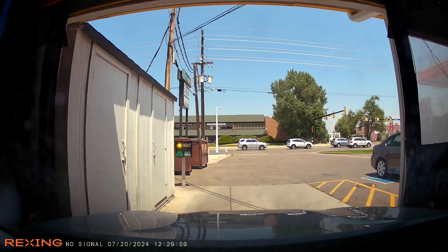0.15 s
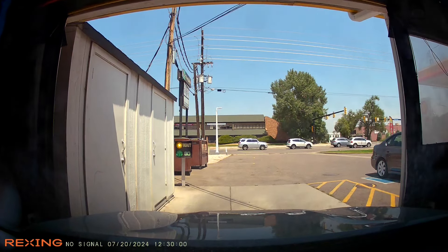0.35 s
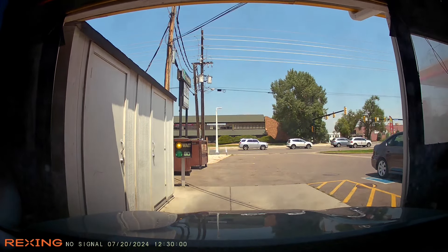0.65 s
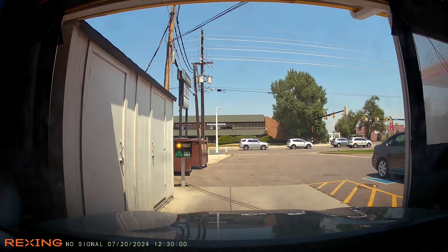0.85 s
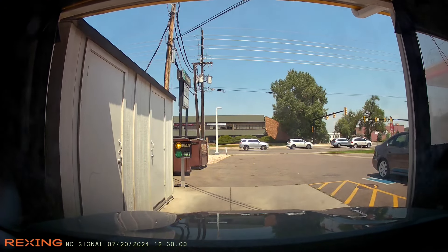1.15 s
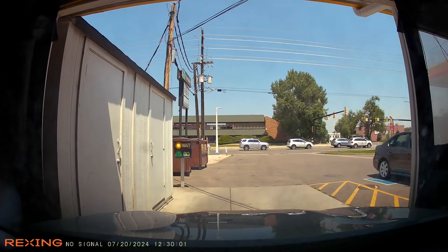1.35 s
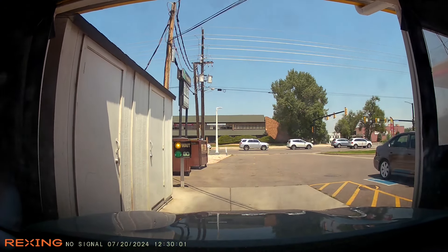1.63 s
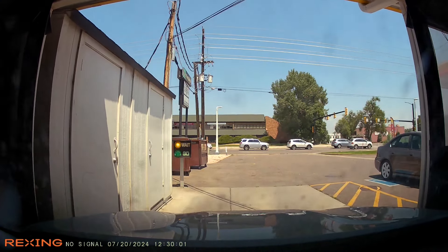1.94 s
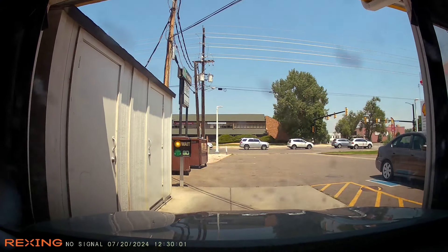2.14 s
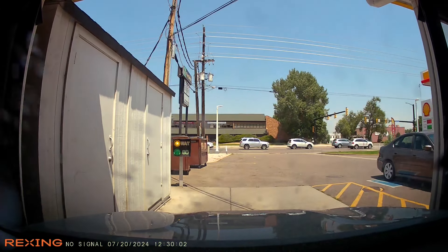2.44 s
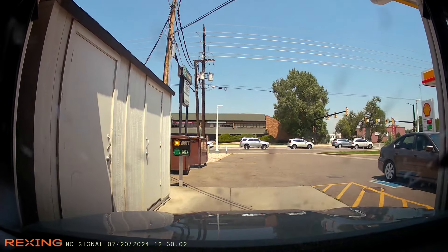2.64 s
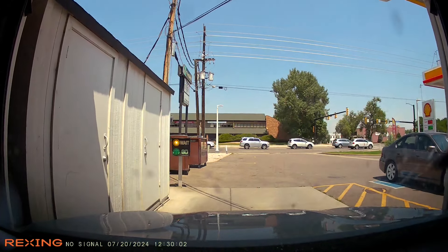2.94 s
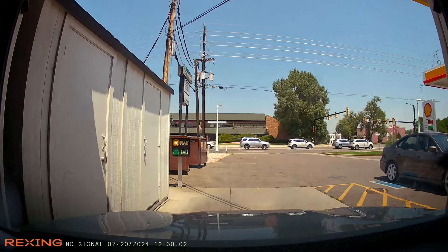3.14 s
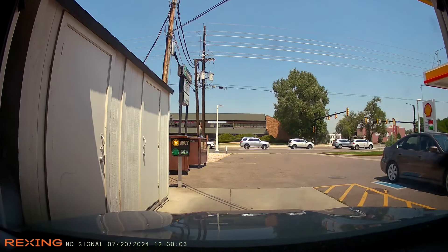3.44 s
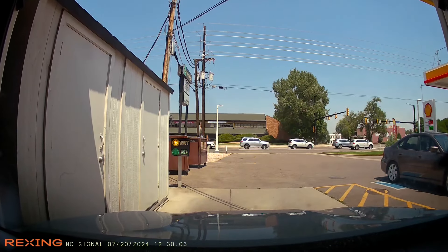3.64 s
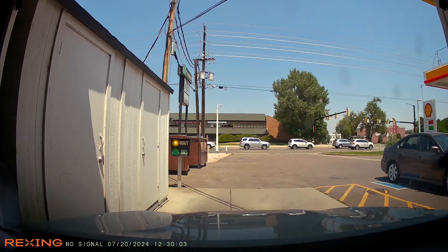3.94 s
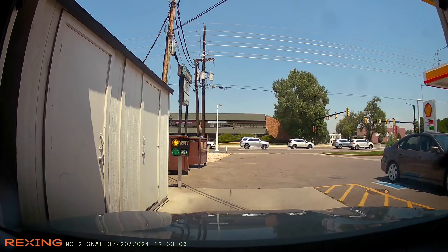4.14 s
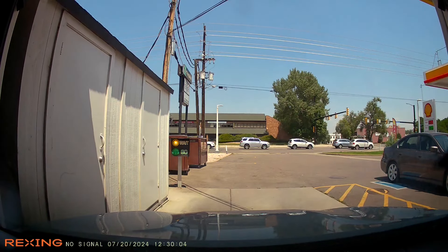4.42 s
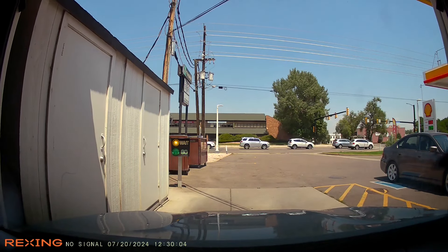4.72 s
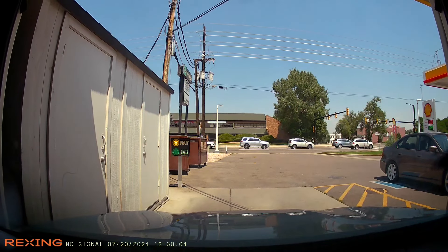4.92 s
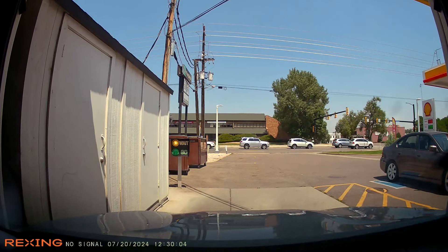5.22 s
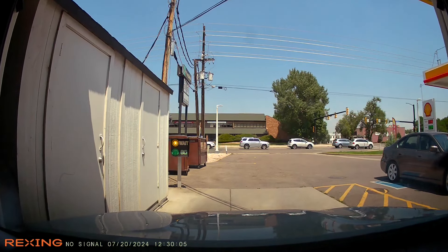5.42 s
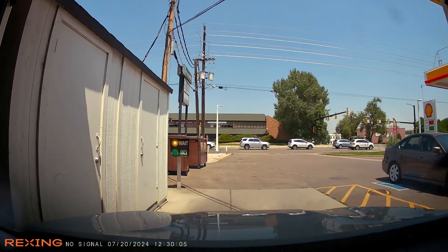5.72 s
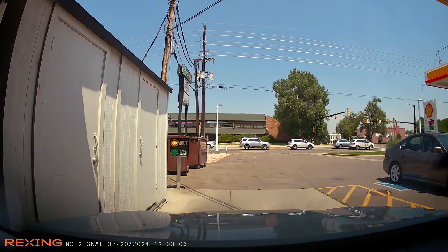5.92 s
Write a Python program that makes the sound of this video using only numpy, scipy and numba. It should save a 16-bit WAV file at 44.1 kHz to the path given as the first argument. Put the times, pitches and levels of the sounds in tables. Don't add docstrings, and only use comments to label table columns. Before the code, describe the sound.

From 0 seconds, a loud continuous blast of air surrounds a closed car under car wash dryers, heard by a two-sided microphone in the cabin. A deep boom drums the roof, fluttering with quick gusts and lulls, over low buffeting of the body and a broad roar across the glass. A faint blade hum wavers and drops out briefly, and a thin door seal hiss sputters on top. Over the first 3 seconds the boom climbs in pitch. At about 2.8 seconds loose trim on the left gives a loud, short falling creak, followed by tiny ticks and an uneven rattle until roughly 3.35. The seal hiss is strongest around 3.3 to 3.6, with flecks of very high whistle. From 3.5 to 6 the roar continues, its boom wavering in pitch, the higher rush and hiss slightly weaker and the hum fading near the end.

```python
import sys
import numpy as np
from scipy import signal
from scipy.fft import rfft, irfft, next_fast_len
from scipy.io import wavfile
from scipy.ndimage import uniform_filter1d
from numba import njit

SR = 44100
rng = np.random.default_rng(int(sys.argv[2]) if len(sys.argv) > 2 else 0)


def volts_from_decibels(level):
    exponent = np.asarray(level, float) / 20
    return 10 ** exponent


def store_wav(level_fs):
    pcm = np.round(np.clip(np.atleast_2d(level_fs), -1, 1) * 32767)
    wavfile.write(sys.argv[1], SR, pcm.T.astype(np.int16))


N = 267676

# time_s, boom_hz, distance_behind_windscreen_m
NOZZLE = [(0, 110, 0), (.7, 118.3, 0.39), (1.3, 121.6, 0.32), (2.3, 145.4, 0.091), (2.7, 136.5, 0.045),
          (3.1, 163.3, 0.42), (3.45, 147.3, 0.81), (4.2, 158.7, 0.91), (5, 144, 1.15), (5.6, 153, 1.07),
          (6.07, 136.7, 1.48)]
# pitch_hz, level_db_per_hz
BUFFET = [(11, -45), (18, -32), (100, -13), (130, -27), (220, -120)]
# pitch_hz, level_db_per_hz
ROAR = [(190, -20), (230, -3), (300, -5), (400, -5), (520, -10.5), (700, -15), (1000, -17), (1500, -19.5),
        (2300, -23.5), (3500, -26.5), (4600, -30.5), (6000, -39), (8000, -47), (12000, -66.5),
        (13600, -100)]
# pitch_hz, level_db_per_hz
SEAL = [(6500, -11), (8500, -3), (10500, -1), (12000, -3), (13300, -8.5), (15500, -25.5)]
# pitch_hz, right_db
LEAN = [(200, 0), (660, 0.5), (1100, 2), (1600, 1.5), (4000, 0.5)]
# pitch_hz, level_db
APART = [(30, -40.5), (60, -19.5), (125, -43), (200, -15.5), (360, -13), (660, -6), (1000, -2), (1700, 0.5),
         (2500, 4), (3500, 5), (5000, 7.5), (9000, 3.5)]
# pitch_hz, width_hz, level_db
CABIN = [(177, 15.7, -25.5), (160.6, 33, -28), (613.3, 22, -42.5), (788, 156, -41.5), (1175, 11, -50),
         (1783, 9.7, -54.5), (1994, 21, -62)]
# start_s, end_s, slips_per_s, unevenness_0_to_1, peak_db, right_port_db
SLIPS = [
    (2.8333, 2.874, 177, .01, -9, -7),
    (2.99, 3.115, 125, .3, -22, -8),
    (3.155, 3.265, 170, .3, -39, -1),
    (3.16, 3.345, 300, .2, -24, -16),
    (2.8107, 2.85, 177, .01, -21, -8),
    (2.8616, 2.905, 177, .05, -23, -8),
]
# start_hz, end_hz, width_hz, level_db
RINGS = [
    [(3850, 3150, 500, 0)],
    [(8600, 8600, 220, -20), (10900, 10900, 600, -18), (1750, 1750, 200, -3), (1200, 1200, 150, -4)],
    [(10250, 9950, 500, 0), (8650, 8650, 200, -3), (11600, 11600, 600, -3)],
    [(1700, 2250, 400, 0), (1250, 1250, 150, -10)],
    [(4500, 4600, 350, 0), (3500, 3500, 400, -3)],
    [(3250, 3500, 300, 0)],
]
# time_s, hiss_db
LEAK = [(0, -54), (.45, -57.5), (.83, -56.5), (1.64, -58.5), (2.1, -56.5), (2.65, -59.5), (3.28, -53),
        (3.5, -54), (3.8, -57), (4.6, -59), (5.05, -58), (5.5, -60), (6.07, -60.5)]
# pitch_hz, width_hz; then the level_db of each
MODES_HZ = [
    (375, 13),
    (440, 24),
]
MODES_DB = (-38.5, -39)
# time_s, change_db, length_s
GUSTS = [(.39, 3, 0.11), (.52, 7, 0.018), (.56, -8, 0.028), (.63, 6, 0.032), (.71, -8.5, 0.03),
         (.81, -3, 0.077), (1.06, -5.5, 0.068), (1.49, -2, 0.04), (1.53, -15, 0.018), (1.74, -5.5, 0.05),
         (1.84, 3.5, 0.044), (1.89, -8, 0.025), (2.04, -4.5, 0.098), (2.18, 8, 0.012), (2.91, 7.5, 0.0085),
         (2.96, -2, 0.035), (3.03, -1.5, 0.051), (3.21, 6.5, 0.017), (3.31, -6, 0.031), (3.9, 4, 0.049),
         (4.15, -6, 0.03), (4.65, 4.5, 0.08), (4.78, 0, 0.04), (5.24, -5, 0.068), (5.43, -15, 0.024),
         (5.57, 3.5, 0.029), (5.68, 2, 0.018), (6.05, 3.5, 0.17)]
# time_s, change_db, length_s
ROCKS = [(.05, -1, 0.067), (1.37, 6.5, 0.12), (1.71, 6.5, 0.031), (2.3, 0, 0.2), (2.64, -3, .06),
         (3.16, 3.5, 0.11), (3.35, -7, 0.094), (3.7, -7, 0.038), (4.8, -8, .06)]
# time_s, level_db
BLADE_TONE = [(0, -33.5), (.4, -34.5), (.72, -33.5), (1.2, -36.5), (1.6, -37), (2.15, -40), (2.5, -35.5),
              (3.05, -34), (3.3, -36), (3.7, -35), (4.1, -35), (4.6, -36.5), (4.9, -40), (5.2, -39),
              (5.55, -34.5), (5.8, -43), (6.07, -48)]
# time_s, change_db, length_s
SHUTS = [(2.0, 0, 0.055), (2.76, -7, 0.033), (3.1, -1.5, 0.074), (3.31, -2, 0.044), (3.45, -2.5, .06),
         (3.85, 3.5, .1), (4.55, -9, 0.043), (4.69, -10, 0.026), (4.79, -5, .03), (5.03, 1.5, 0.072),
         (5.33, -1, .04), (5.62, -10, 0.03), (5.8, -1, 0.038), (5.9, -2, .04), (6.04, -13, .04)]
# time_s, change_db, length_s
FINDS = [
    [(.45, 7, 0.26), (1.39, 7, 0.12), (2.1, -1, 0.04), (2.72, 14, 0.062), (3.23, 11, 0.05),
     (3.85, 18.5, 0.089), (4.6, 3, 0.21), (5.45, 9.5, 0.2), (6.0, 7, 0.18)],
    [(.32, 2, .06), (.68, 10, 0.12), (1.15, 6, 0.097), (1.55, 9, 0.49), (2.65, 9, 0.2), (2.95, -8, 0.086),
     (3.8, 8, 0.11), (5.07, 5, 0.1), (5.4, 4, 0.056)],
]
# low_hz, high_hz, level_under_leak_db, ease_of_opening, opens_per_db
WHISTLES = [
    (13750, 14050, -18, -1.6, .02),
    (14450, 14850, -18, -4.5, .36),
    (15100, 15600, -14, -7.8, .5),
]
# time_s, change_db, length_s
WIDEST = [(3.6, 7, .5)]
# time_s, change_db, length_s
BEATS = [(.17, -14.5, 0.042), (.39, -10, 0.028), (.94, -15, 0.03), (1.11, -7, 0.037), (1.28, -13, 0.055),
         (1.74, -2, .06), (2.08, -9, .06), (2.75, -10, .05), (2.93, -12, 0.039), (3.09, -9, .03),
         (3.38, -3.5, .05), (3.6, -8, .03), (3.92, -12, .04), (4.75, -15, .025), (4.96, -7, .04),
         (5.06, 8, 0.044), (5.27, -14, .06), (5.68, -8, .04)]
# time_s, peak_db, ring_hz, width_hz
TICKS = [(3.002, -34, 8600, 200), (3.017, -33, 8600, 200), (3.030, -31, 8600, 200), (3.038, -34, 8600, 200),
         (3.044, -38, 8600, 200), (3.054, -36, 8600, 200), (3.066, -32, 8600, 200), (3.101, -39, 8600, 200),
         (3.029, -39, 9900, 350), (3.052, -38, 10200, 350), (3.060, -31, 9700, 350),
         (3.178, -39, 10000, 400), (3.186, -38, 10100, 400), (3.192, -35, 10200, 400),
         (3.213, -38, 9800, 400), (3.244, -37, 10100, 400), (3.184, -15, 1740, 200),
         (3.206, -18, 1900, 300), (3.243, -19, 2030, 300), (3.274, -23, 2150, 300), (3.322, -22, 1980, 300),
         (2.921, -29, 3300, 350)]
# time_s, change_db, length_s
DRUMS = [
    (.33, -12, 0.18),
    (.88, 8, 0.053),
    (1.3, -1, 0.22),
    (2.4, -3, 0.19),
    (3.0, 2, 0.3),
    (4.0, -1, .2),
    (4.7, -1, 0.19),
    (5.4, 2.5, 0.1),
]

BUFFET_DB, BUFFET_DB_PER_S = -21, -1.09
BOOM_DB, BOOM_DB_PER_OCTAVE, BOOM_WIDTH_HZ, NARROWS_HZ_PER_M = -16, 4, 152, 57.5
ROAR_DB, ROAR_DB_PER_M, RUSH_DB, RUSH_DB_PER_M = -22, -1.5, -37, -4.0
TOP_DB, TOP_OPENS_PER_DB, TIP_DB = -9, 0.5, -14
BLADE_HZ, BLADE_WIDTH_HZ, BLADE_STEADY = 590.8, 7, 1.4
MODES_DB_PER_M = -3
TICK_RIGHT_DB = -14
SHARED_HZ = 6200


def curve(table):
    s, *columns = np.transpose(table)
    return [np.interp(np.arange(N) / SR, s, column) for column in columns]


def at(table, hz):
    table_hz, level_db = np.transpose(table)[:2]
    return np.interp(np.log(hz), np.log(table_hz), level_db)


def bumps(rows):
    t = np.arange(N) / SR
    return sum(db * np.exp(-((t - s) / length) ** 2) for s, db, length in rows)


def walk(rate):
    hold = int(SR / rate)
    levels = np.repeat(rng.standard_normal(N // hold + 1), hold)
    return 1.41 * uniform_filter1d(uniform_filter1d(levels, hold), hold)[:N]


def unit(x):
    return x / np.sqrt(np.mean(x ** 2))


def even(x, span_s):
    span = int(span_s * SR)
    power = uniform_filter1d(uniform_filter1d(np.mean(x ** 2, axis=0), span), span)
    return x / np.sqrt(power + 1e-12)


@njit
def svf(x, hz, width):
    y, band, low = np.empty(len(x)), 0., 0.
    for i in range(len(x)):
        g, damping = np.tan(np.pi * hz[i] / SR), width[i] / hz[i]
        v = (band + g * (x[i] - low)) / (1 + g * (g + damping))
        band, low, y[i] = 2 * v - band, low + 2 * g * v, damping * v
    return y


def field():
    size = next_fast_len(N)
    hz = np.arange(1, size // 2 + 2) * SR / size
    apart, lean = volts_from_decibels(at(APART, hz)), volts_from_decibels(at(LEAN, hz) / 2)
    mid, side = rfft(rng.standard_normal((2, size))) / np.sqrt(1 + apart ** 2)
    left = (mid + apart * side) / lean
    right = (mid - apart * side) * lean
    return hz, np.array([left, right])


def coloured(table, low_hz, high_hz, edge):
    hz, ports = field()
    fade = np.clip(.5 + np.log2([hz / low_hz, high_hz / hz]) / edge, 0, 1)
    gain = volts_from_decibels(at(table, hz)) * np.prod(np.sin(np.pi / 2 * fade), axis=0)
    return irfft(ports * gain)[:, :N]


def ring(hz, width, count=2):
    ports = irfft(field()[1])[:, :N]
    for _ in range(count):
        ports = np.array([svf(x, hz + np.zeros(N), width + np.zeros(N)) for x in ports])
    return unit(ports)


def buffet():
    level_db = BUFFET_DB + BUFFET_DB_PER_S * np.arange(N) / SR + bumps(ROCKS)
    return even(coloured(BUFFET, 14, 99.5, 0.93), 0.94) * volts_from_decibels(level_db)


def roof_boom():
    boom_hz, behind_m = curve(NOZZLE)
    octaves_up = np.log2(boom_hz / NOZZLE[0][1])
    level_db = BOOM_DB + BOOM_DB_PER_OCTAVE * octaves_up + bumps(GUSTS)
    width_hz = BOOM_WIDTH_HZ - NARROWS_HZ_PER_M * behind_m
    return even(ring(boom_hz, width_hz, count=4), 0.097) * volts_from_decibels(level_db)


def air_roar():
    behind_m = curve(NOZZLE)[1]
    roar_db = ROAR_DB + ROAR_DB_PER_M * behind_m
    rush_db = RUSH_DB + RUSH_DB_PER_M * behind_m
    air = 0
    for hz in 190 * 2 ** np.arange(0, 6.1, .5):
        rush_share = np.clip(np.log2(hz / 600) / 0.79, 0, 1)
        trend_db = rush_share * (rush_db - roar_db + 14) + roar_db
        band = coloured(ROAR, hz, hz * np.sqrt(2), 0.28)
        air = air + band * volts_from_decibels(trend_db + 0.94 * walk(9))
    return air * volts_from_decibels(22)


def gap_db():
    return curve(LEAK)[0] + bumps(SHUTS)


def choke_db(open_db, ease, opens_per_db):
    push = walk(30) - opens_per_db * (open_db + 60) - ease
    return 75 * np.clip(3 * push, 0, 1)


def seal_hiss():
    open_db = gap_db()
    leak_db = open_db - 1.8 * np.clip(walk(28), 0, 3)
    top_db = leak_db + TOP_DB - choke_db(open_db, -0.1, TOP_OPENS_PER_DB)
    tip_db = leak_db + TIP_DB - choke_db(open_db, -1.2, TOP_OPENS_PER_DB)
    body = unit(coloured(SEAL, 6000, 12000, .1)) * volts_from_decibels(leak_db + 0.3)
    top = unit(coloured(SEAL, 12000, 12800, .04)) * volts_from_decibels(top_db)
    tip = unit(coloured(SEAL, 12800, 13500, .04)) * volts_from_decibels(tip_db)
    return body + top + tip


def whistles():
    open_db = gap_db()
    wide_db = open_db + bumps(WIDEST)
    out = 0
    for low_hz, high_hz, db, ease, opens_per_db in WHISTLES:
        level_db = open_db + db - choke_db(wide_db, ease, opens_per_db)
        out = out + unit(coloured(SEAL, low_hz, high_hz, .04)) * volts_from_decibels(level_db)
    return out


def impeller():
    steady = BLADE_STEADY * np.sin(2 * np.pi * BLADE_HZ * np.arange(N) / SR)
    tone = unit(steady + 0.3 * ring(BLADE_HZ, BLADE_WIDTH_HZ))
    return tone * volts_from_decibels(curve(BLADE_TONE)[0] + bumps(BEATS) + 0.6 * walk(7.89))


def cabin_resonances():
    fade_db = MODES_DB_PER_M * curve(NOZZLE)[1]
    out = 0
    for (hz, width), db, finds in zip(MODES_HZ, MODES_DB, FINDS):
        level_db = db + fade_db + bumps(finds) + 1.4 * walk(6.03)
        out = out + even(ring(hz, width), 0.048) * volts_from_decibels(level_db)
    for hz, width, db in CABIN:
        level_db = db + 1.64 * walk(2.534)
        if hz > 500:
            level_db = level_db + 0.63 * fade_db
        if hz < 200:
            level_db = level_db + bumps(DRUMS)
        out = out + ring(hz, width) * volts_from_decibels(level_db)
    return out


def trim_ring(clicks, hz, width):
    for _ in range(3):
        clicks = svf(clicks, hz, np.full(len(clicks), 2. * width))
    return clicks * SR / (2 * np.pi * width)


def both_ports(rung, right_db):
    return np.array([rung, volts_from_decibels(right_db) * np.roll(rung, 5)])


def trim():
    out, t = np.zeros((2, N)), np.arange(N) / SR
    for (start_s, end_s, rate, uneven, db, right_db), rings in zip(SLIPS, RINGS):
        wait_luck, level_luck = rng.standard_normal((80, 2)).T
        when = start_s + np.cumsum(np.exp(uneven * wait_luck)) / rate
        part = np.clip((when - start_s) / (end_s - start_s), 0, 1)
        swell = np.sin(np.pi * part ** .75) ** 1.8
        clicks = np.zeros(N)
        clicks[(when * SR).astype(int)] = swell * volts_from_decibels((.8 + 8 * uneven) * level_luck)
        span = slice(int(start_s * SR), int((end_s + .05) * SR))
        for start_hz, end_hz, width, ring_db in rings:
            hz = np.interp(t[span], [start_s, end_s], [start_hz, end_hz])
            rung = trim_ring(clicks[span], hz, width)
            out[:, span] += volts_from_decibels(db + ring_db) * both_ports(rung, right_db)
    return out


def ticks():
    out, size = np.zeros((2, N)), 1024
    for s, db, hz, width in TICKS:
        click = 1. * (np.arange(size) == 8)
        rung = trim_ring(click, np.full(size, 1. * hz), width) * volts_from_decibels(db)
        start = int(s * SR)
        out[:, start:start + size] += both_ports(rung, TICK_RIGHT_DB)
    return out


def scene():
    jet = buffet() + roof_boom() + air_roar()
    leak = seal_hiss() + whistles()
    blower = impeller() + cabin_resonances()
    return jet + leak + blower + trim() + ticks()


def share_treble(x):
    f, t, z = signal.stft(x, SR, window="cosine", boundary="even", nperseg=2048)
    number = np.arange(16)
    band = np.clip((f - SHARED_HZ) // 620 + 1, 0, 15).astype(int)
    power = (band == number[:, None]) @ uniform_filter1d(abs(z) ** 2, size=3) + 1e-20
    faint = 10 * np.log10(np.median(power[0], axis=1, keepdims=True) / power[0]) / 9
    odds = np.interp(number, [0, 1, 9, 10, 15], [9, 0.13, .16, 0.48, .4])[:, None]
    odds = odds + np.clip(faint, 0, .6) * (number[:, None] > 3)
    luck = rng.random((2, 16, len(t) // 2 + 1)).repeat(2, axis=2)[:, :, :len(t)]
    separate = (luck[0] < odds) | (power[0] > 3.5 * power[1])
    z[1] = np.where(separate[band], z[1], z[0] * volts_from_decibels(2.5))
    loss_db = np.minimum(number, 6)[:, None] * 3.5 * luck[1] ** 4
    z *= volts_from_decibels(-loss_db)[band]
    return signal.istft(z, SR, window="cosine", nperseg=2048)[1][:, :N]


def low_pass(x):
    return signal.sosfilt(signal.butter(12, 15600, fs=SR, output="sos"), x)


def record(dry):
    x = share_treble(np.tanh(1.115 * dry) / 1.143)
    fade = np.sin(np.pi / 2 * np.minimum(np.arange(N, 0, -1) / 300, 1)) ** 2
    return low_pass(x * fade)


dry = scene()
out = record(dry)
store_wav(out)
```